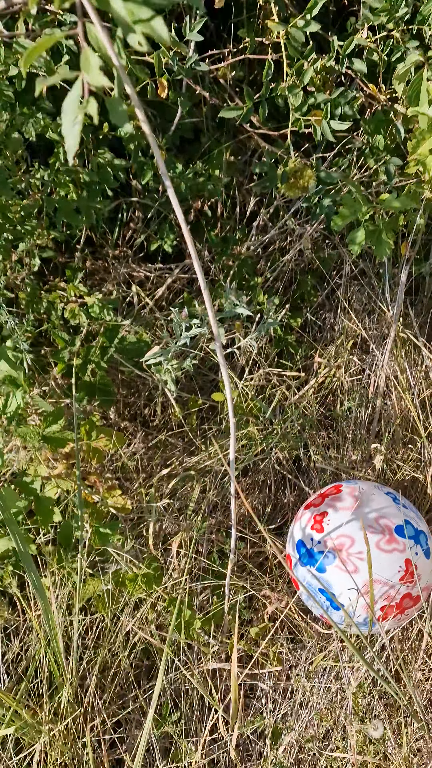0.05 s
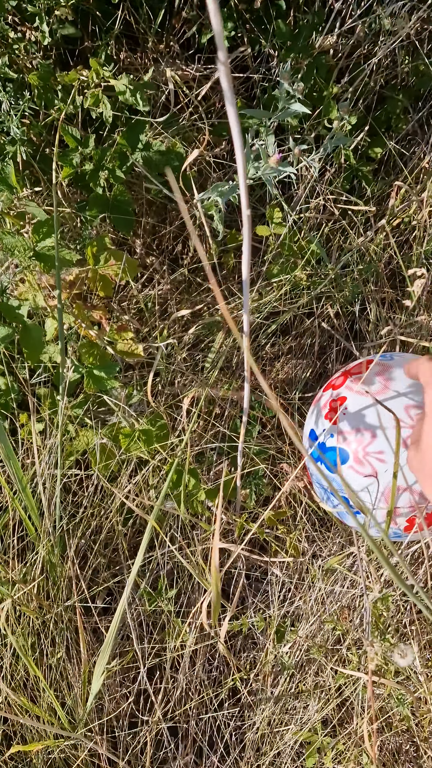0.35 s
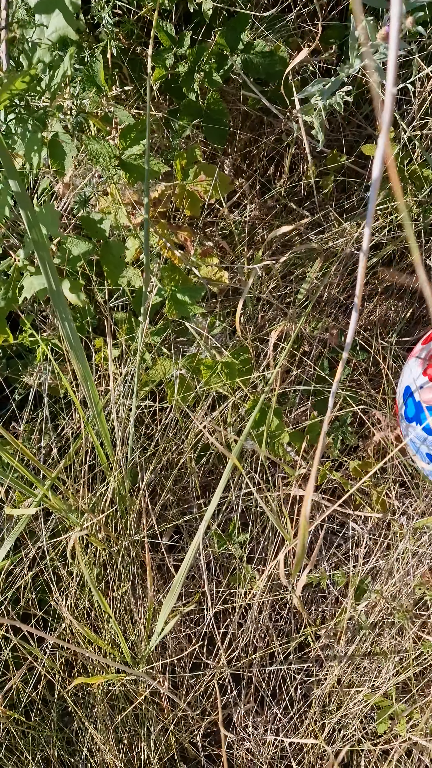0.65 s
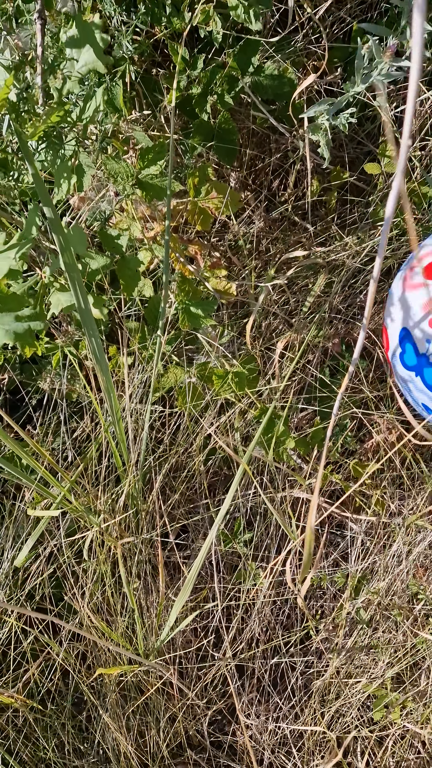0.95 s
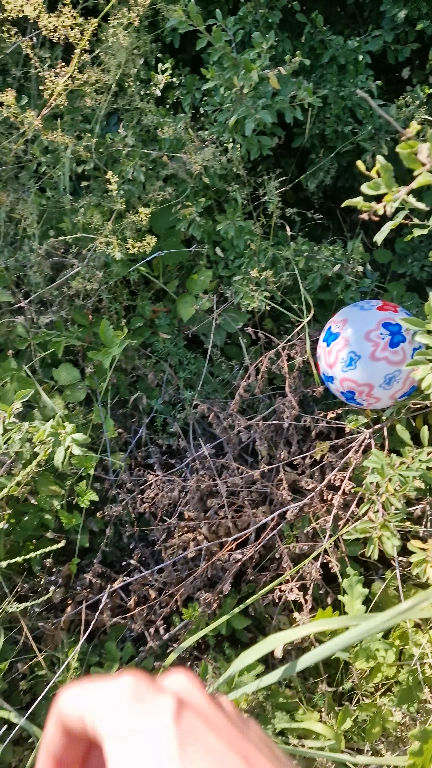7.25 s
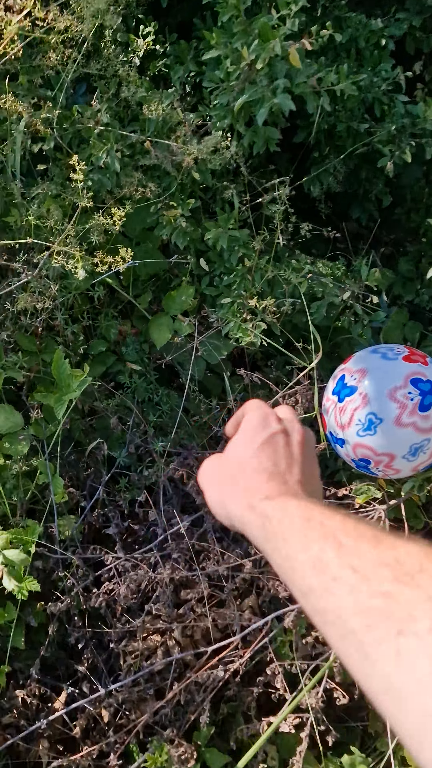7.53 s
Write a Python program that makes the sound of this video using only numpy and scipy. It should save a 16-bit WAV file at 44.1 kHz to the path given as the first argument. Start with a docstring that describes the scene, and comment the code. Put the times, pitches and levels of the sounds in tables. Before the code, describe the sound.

Dry grass and brush crackle close to a hand-held phone outdoors as a hollow plastic ball is pushed through. For the first second or so, blades swish softly and stalks snap, with dry ticks beside the microphone and stems scraping and tapping the ball, making it ring faintly. A lull follows, then light rustling from 2 to 3 seconds with a few single cracks. Near 3.9 seconds, soft handling bumps touch the phone. From about 4.2 to 6.4 seconds, stems rub and flick the ball repeatedly, giving dull scrapes, clacks and hollow rings among swishes and snaps, while light wind puffs buffet the microphone. After a brief dip, the rustle swells from 7 seconds into the loudest crunch, with hard taps on the ball and a very sharp crack at 7.6 seconds. A faint, distant hum of land and insects lies behind everything.

```python
"""Dry grass and brush crackle as a hollow plastic ball is pushed through, close to a hand-held phone.
Blades swish and stalks snap; stems scrape and tap the ball, ringing its skin and the air inside.
Dry ticks sound right beside the phone's two microphone ports, which also take soft bumps and puffs of air.
The place is outdoors, with a faint far-off hum of land and insects behind it all."""
import sys
import numpy as np
from scipy import signal
from scipy.fft import rfft, irfft, next_fast_len
from scipy.io import wavfile

SR = 44100
rng = np.random.default_rng(int(sys.argv[2]) if len(sys.argv) > 2 else 0)


def inscribe(sig):
    """Save sig as 16-bit PCM at rate SR to the path in sys.argv[1].

    A 1-D sig is mono; a 2-D sig holds one channel per row.
    Samples are clipped to [-1, 1] before scaling.
    """
    pcm = np.round(np.clip(np.atleast_2d(sig).T, -1, 1) * 32767)
    wavfile.write(sys.argv[1], SR, pcm.astype(np.int16))


N = 339129
T = np.arange(N) / SR
SLOW_T = T[::64]  # coarse clock for slow envelopes

# where the brush moves, seen from the phone: t/s, bearing (-1 left to 1 right)
BRUSH_BEARING = [(0, 0.49), (.7, -0.6), (1.4, -0.03), (2.1, 1), (3.0, 1), (4.3, -0.43), (5.8, -0.23),
                 (6.1, -0.15), (6.5, 0.17), (7.15, 0.53), (7.69, 0.86)]
# spectrum of coarse woody stalks: f/Hz, level/dB
STALK_SPECTRUM = [(300, -5), (700, -2), (1100, -4.5), (1900, 1), (2400, 1.5), (2900, -4), (3700, -1.5),
                  (4600, -1), (7000, 3.5), (15000, -34)]
# spectrum of breaking fibres: f/Hz, level/dB
FIBRE_SPECTRUM = [(1500, -44), (4700, -9.5), (5900, 0.5), (7400, 3), (9300, -2.5), (12000, 2.5)]
# resonances of the air inside the ball: f/Hz, width/Hz, level/dB
AIR_MODES = [(1344, 23.6, 1), (2040, 16.4, -4.5), (2705, 18, -13), (3450, 21, -14.5), (3980, 40, -16.5)]


def brush():
    """Fine blades fizz over crackling stalks; when few move, they go in flurries and single cracks."""
    # spectrum of fine dry blades: f/Hz, level/dB
    blade_spectrum = [(600, -59), (1500, -16.5), (3000, -15), (4600, -9), (6000, -4.5), (7400, 1.5),
                      (9300, -2.5), (11500, -0.5), (13000, -1), (15500, 1)]
    crowd_db = -46.5  # above this so many blades move at once that the crackle evens out
    blade_gain, stalk_gain = swishes()
    sparse = 1 / (1 + blade_gain / undb(crowd_db))
    flurry = unit(undb(sparse * (2.05 * walk(45) + 1.5 * walk(400))))
    fizz = drifting_comb(grains(spread_db=2.5, scatter=.4, count=60000))
    crackle = drifting_comb(grains(spread_db=1.5, scatter=.18, count=14000))
    cracks = drifting_comb(grains(spread_db=3.5, scatter=.4, count=300))
    brittle = colour(cracks, FIBRE_SPECTRUM) * sparse * undb(-3)
    blades = (colour(fizz, blade_spectrum) * undb(4) + brittle) * blade_gain * pan(shadow())
    stalks = colour(crackle, STALK_SPECTRUM) * stalk_gain * pan(.5 * shadow())
    return (blades + stalks) * flurry


def swishes():
    """Gains of blades and of stalks: each tuft bends and slips past, swelling and fading evenly in dB."""
    # tufts passing the ball: peak t/s, level/dB, rise/s, fall/s, share of coarse stalks/dB
    tufts = [(.04, -56.5, 0.68, 0.41, 1), (.21, -57, 0.12, 0.55, -1), (.5, -59, 0.4, 0.45, 1),
             (.72, -61.5, 0.84, 0.34, -4.5), (.89, -59.5, 0.73, 0.34, -6), (1.02, -57, 0.42, 0.17, -3),
             (1.11, -63.5, 0.11, 0.2, -3), (1.35, -76, 0.72, 1.0, -8.5), (2.06, -64, 0.26, 0.13, -9),
             (2.24, -66, 0.4, .085, -9), (2.36, -60, 0.14, 0.17, -4.5), (2.42, -59.5, 0.11, 0.17, -4),
             (2.53, -57, 0.098, 0.1, -5), (2.65, -63, 0.54, 0.59, -10), (3.57, -76, 0.3, 0.25, -5),
             (4.16, -68.5, 0.3, 0.28, -18), (4.3, -62, 0.11, 0.17, 1.5), (4.55, -66, 0.55, 0.23, -1.5),
             (4.75, -62, 0.21, 0.2, -17), (4.87, -53.5, 0.038, 0.1, -1), (5.005, -56.5, 0.15, 0.24, -1.5),
             (5.26, -69.5, 0.58, 0.77, 3.5), (5.481, -59.5, 0.089, 0.089, -13),
             (5.565, -53.5, 0.053, 0.092, -24), (5.82, -66, 0.3, 0.26, -9.5), (5.99, -50.5, 0.34, 0.5, -5),
             (6.1, -53.5, 0.36, 0.59, -3), (6.35, -54, 0.48, 0.4, -6.5), (7.2, -48.5, 0.25, 0.35, -5),
             (7.38, -44.5, 0.67, 0.45, -1.5), (7.469, -32, 0.22, 0.18, -5.5), (7.494, -28, 0.12, 0.13, -7),
             (7.577, -37, 0.1, 0.17, 0.5), (7.67, -48.5, 0.071, .2, -16)]
    range_db = 32.5  # climbed in the rise time, dropped in the fall time
    blades, stalks = 0, 0
    for s, db, rise, fall, coarse_db in tufts:
        gain = undb(db - range_db * np.maximum((s - SLOW_T) / rise, (SLOW_T - s) / fall))
        blades = np.hypot(blades, gain)
        stalks = np.hypot(stalks, gain * undb(coarse_db))
    return np.interp(T, SLOW_T, blades), np.interp(T, SLOW_T, stalks)


def snaps():
    """A stalk breaks in a tight volley of bright fibre cracks over a woody body; then splinters settle."""
    # stalks breaking: t/s, level/dB, decay/s, woody body/dB
    breaks = [(.139, -46.5, .002, -18), (.191, -38.5, .002, -18), (.222, -43, .004, -18),
              (.291, -46.5, .002, -14), (.474, -48, .002, -12), (.583, -42, .0015, -12),
              (.639, -42, .002, -15), (.741, -50, .002, -5), (.7675, -39, .002, -26),
              (.876, -47, .002, -20), (1.022, -46, .003, -11), (2.670, -52, .002, -16),
              (2.6985, -47.5, .0015, -18), (2.9585, -38.5, .0013, -28), (3.8645, -55, .002, -6),
              (4.244, -49, .001, -18), (4.410, -55, .002, -14), (4.526, -53.5, .003, 0),
              (4.859, -44.5, .007, -4), (4.904, -46, .002, -14), (5.063, -52, .003, -12),
              (5.195, -53, .005, -18), (5.2205, -53, .0015, -3), (5.3295, -47.5, .002, -8),
              (5.564, -46, .005, -14), (5.7765, -41.5, .0016, -8), (6.123, -43, .002, -10),
              (6.3235, -35, .002, -15), (6.502, -50, .006, -15), (6.7663, -40, .0017, -16),
              (6.890, -52, .004, -16), (7.3715, -23, .0016, -22), (7.555, -30, .002, -15),
              (7.579, -22, .0013, -9), (7.599, -28, .0015, -10), (7.6097, -9, .001, -12),
              (7.624, -27, .002, -16)]
    settle_db, settle_s = -25, .018
    out, t = np.zeros((2, N)), T[:SR // 8]
    for s, db, decay, body_db in breaks:
        fibres = unit(rng.choice([-1, 1], (2, len(t))) * rng.exponential(size=len(t)))
        crack = fibres * 2 * burst(t, decay, rise=decay / 4)
        splinters = fibres * undb(settle_db) * burst(t, settle_s, rise=decay)
        body = undb(body_db) * colour(crack[:1], STALK_SPECTRUM)
        add(out, s, (colour(crack + splinters, FIBRE_SPECTRUM) + body) * undb(db))
    return out * pan(shadow())


def scrapes():
    """Stems stick and slip on the plastic: at each slip the skin answers dully and the air rings on."""
    # spectrum of the rubbed skin: f/Hz, level/dB
    skin_spectrum = [(60, -5.5), (160, -20.5), (280, 6), (460, 5), (590, -9), (760, -3), (1000, -12.5),
                     (1800, -13), (3000, -15), (8000, -92)]
    # the skin's own drum note: f/Hz, width/Hz, level/dB
    drum_mode = [(471, 90, 0)]
    # the spot being rubbed favours the lowest ring or the higher ones: t/s, overtones/dB
    rub_balance = [(.7, 5), (.85, -1), (4.3, 15), (4.37, 2.5), (5.3, 2), (5.8, -5.5)]
    skin_gain, air_gain = slides()
    slipping = unit(undb(1.94 * walk(60) + 1.4 * walk(250)))
    slips = grains(spread_db=1, scatter=.3, count=4000) * slipping
    skin = colour(slips * skin_gain, skin_spectrum) * undb(-5)
    drum = resonate(slips[0] * skin_gain, drum_mode) * undb(-10.5)
    air_drive = slips[1] * air_gain
    lowest = resonate(air_drive, AIR_MODES[:1]) * undb(-3)
    overtones = resonate(air_drive * undb(follow(rub_balance)), AIR_MODES[1:]) * undb(-6.5)
    return (skin + ring_at_ports(drum + flex(lowest + overtones))) * pan(-1.5)


def slides():
    """Gains of the ball's skin and of its air: each stem grips quickly, eases as it slides and lets go."""
    # stems sliding on the ball: start t/s, length/s, level/dB, ring of the air inside/dB
    strokes = [(0.0, 0.078, -50.5, -16), (0.203, 0.034, -56, -11), (0.264, 0.17, -59.5, -12),
               (0.435, 0.03, -55.5, -16), (0.628, 0.17, -60, -6), (0.824, 0.14, -62.5, -2),
               (1.008, 0.12, -68, -10), (4.271, 0.05, -51, -12), (4.344, 0.33, -55, -12),
               (4.494, 0.086, -52, -13), (4.699, 0.058, -53, -13), (4.76, 0.04, -60, -3),
               (4.867, 0.046, -55, -9), (4.958, 0.12, -52, -13), (5.206, 0.081, -54.5, -10.5),
               (5.306, 0.09, -55, -12.5), (5.456, 0.086, -61.5, -9.5), (5.546, 0.024, -59, -12),
               (5.77, 0.12, -53, -5), (5.916, 0.16, -49.5, -7.5), (6.063, 0.045, -41, -24),
               (6.141, 0.041, -51.5, -12), (6.258, 0.13, -63.5, -10), (7.153, 0.36, -62, -4),
               (7.382, 0.1, -48.5, -28), (7.46, 0.027, -34.5, -35), (7.55, 0.043, -45, -5)]
    grip_s, sag_db_per_s, release_s = .0039, 13.5, .027
    skin, air = 0, 0
    for s, length, db, ring_db in strokes:
        t = np.maximum(SLOW_T - s, 0)
        grip = 1 - np.exp(-t / grip_s)
        release = np.exp(-np.maximum(t - length, 0) / release_s)
        gain = grip * undb(db - sag_db_per_s * t) * release
        skin = np.hypot(skin, gain)
        air = np.hypot(air, gain * undb(ring_db))
    return np.interp(T, SLOW_T, skin), np.interp(T, SLOW_T, air)


def flex(ring):
    """The rubbed ball keeps changing shape, so its ring wavers to and fro in time."""
    waver_s = .00019
    return np.interp(T + waver_s * walk(50), T, ring)


def taps():
    """A stem flicks the ball: a clack, a swing of the skin at the stem's pitch, then a hollow ring."""
    # stems striking the ball: t/s, level/dB, decay/s, stem f/Hz, ring level/dB, its overtones/dB
    flicks = [(.031, -47.5, .0047, 600, -57, 2), (.449, -44, .0015, 405, -60, -3),
              (.853, -59, .003, 700, -54.5, -7), (.886, -64, .003, 450, -66, 12),
              (1.021, -45.5, .0025, 1800, -54, -3), (1.252, -58, .013, 376, -79, -2),
              (4.25, -43.5, .016, 436, -72, 15), (4.272, -48, .012, 310, -70, 10),
              (4.288, -44, .01, 624, -64, 19), (4.462, -45.5, .0059, 640, -58, 1),
              (4.525, -44, .003, 520, -60, -4), (4.738, -41, .011, 397, -59, -3),
              (4.781, -54, .012, 1350, -47.5, -11), (4.941, -37.5, .008, 580, -52, 0),
              (4.993, -46, .0018, 600, -57, 3), (5.221, -44, .0016, 980, -56, 0),
              (5.328, -37, .0047, 480, -51, -.5), (5.49, -48, .016, 494, -63, -8),
              (5.785, -52, .012, 500, -55, -12), (6.168, -50, .0055, 1400, -50, -14),
              (6.077, -32.5, .016, 480, -48, -14), (6.091, -40, .012, 770, -45, -14),
              (7.486, -28, .008, 320, -62, -4), (7.502, -32, .008, 540, -62, -4),
              (7.5795, -16.5, .0011, 690, -54, -6), (7.6098, -17.5, .0018, 450, -52, 0)]
    # spectrum of a clack: multiple of the stem's pitch, level/dB
    clack_spectrum = [(.2, -5.5), (.6, -7.5), (1, 3.5), (1.5, -4.5), (2.4, -12.5), (5, -21), (12, -25.5)]
    squeeze = .013  # each tap dents the ball and detunes its ring by about this share
    clacks, rings, t = np.zeros((2, N)), np.zeros((1, N)), T[:SR // 6]
    contact = grains(spread_db=3, scatter=.24, count=200000)
    for (s, db, decay, hz, ring_db, overtones_db), dent in zip(flicks, rng.standard_normal(len(flicks))):
        blow = np.roll(contact, -int(s * SR), axis=1)[:, :len(t)] * burst(t, decay, rise=.000072)
        clack = colour(blow, np.array(clack_spectrum) * (hz, 1))
        skin_note = damped_tone(t, hz, decay, rise=decay / 10)
        add(clacks, s, (clack + skin_note) * undb(db - 5.5))
        detune = 1 + squeeze * dent
        lowest, *overtones = [
            undb(mode_db) * damped_tone(t, mode_hz * detune, 1 / (np.pi * width), rise=decay / 4)
            for mode_hz, width, mode_db in AIR_MODES]
        add(rings, s, undb(ring_db) * (lowest + undb(overtones_db) * sum(overtones))[None])
    return (clacks + ring_at_ports(rings[0])) * pan(-.72)


def ticks():
    """Hard little contacts ring for a cycle or two and push the two ports in opposite directions."""
    # dry ticks right beside the phone: t/s, level/dB, f/Hz
    contacts = [(0.013, -38.5, 1290), (0.236, -44, 1500), (0.297, -45, 1310), (0.3123, -42, 1650),
                (0.323, -41.5, 1660), (0.4233, -39, 1584), (.4945, -40, 1610), (1.192, -57, 1350)]
    # ring of a tick: multiple of its pitch, level/dB, decay/s
    modes = [(.68, -9, 0.0011), (1, 7.5, 0.0008), (1.27, -1, 0.00077)]
    top_hz = 2450
    out, t = np.zeros((2, N)), T[:SR // 50]
    for s, db, hz in contacts:
        tick = sum(undb(mode_db) * damped_tone(t, multiple * hz, decay, rise=.00018)
                   for multiple, mode_db, decay in modes)
        add(out, s, undb(db) * tick * np.array([[1], [-1]]))
    return signal.sosfilt(signal.butter(6, top_hz, fs=SR, output="sos"), out) * pan(-9)


def bumps():
    """Handling noise: soft contacts push the phone to and fro for a cycle or two."""
    # bumps on the phone: peak t/s, level/dB, f/Hz, half length/s
    knocks = [(3.869, -41, 275, 0.0037), (3.901, -39, 227, 0.0015), (3.9177, -36, 290, 0.0014),
              (3.962, -34.5, 252, 0.0016), (6.867, -48, 219, 0.0021)]
    motion = sum(undb(db) * swell(s, half) * np.cos(2 * np.pi * hz * (T - s)) for s, db, hz, half in knocks)
    return motion * pan(-5)


def wind():
    """A light breeze and a few puffs of air buffet the microphone ports."""
    # puffs on the microphone: peak t/s, level/dB, half length/s
    puffs = [(0.08, -44.5, 0.067), (0.225, -51.5, 0.11), (3.937, -52.5, 0.074), (5.43, -49.5, 0.046),
             (5.593, -48, 0.051), (5.725, -44, 0.082), (5.945, -43.5, 0.045), (6.082, -45.5, 0.058),
             (6.313, -52.5, 0.04), (7.57, -54, 0.054), (7.689, -53, 0.038)]
    # spectrum of the buffeting: f/Hz, level/dB
    buffet_spectrum = [(15, -14.5), (35, 1), (68, 3.5), (105, -13), (180, -27), (400, -54), (2000, -95)]
    gusts = sum(undb(db) * swell(s, half) for s, db, half in puffs)
    breeze = undb(-66.5 + .5 * walk(3.2))
    buffet = colour(diffuse(alike_hz=159), buffet_spectrum)
    return buffet * np.hypot(gusts, breeze) * undb(1.5) * pan(-.33)


def distant_land():
    """Land and insects hum far off on all sides, almost steady."""
    # spectrum of the far background: f/Hz, level/dB
    land_spectrum = [(60, -2.5), (110, 6), (190, -12), (290, -1), (470, -8), (1000, -7.5), (1650, -13.5),
                     (1950, -12), (2600, -24), (5000, -25), (7500, -13), (9000, -26), (11500, -33),
                     (16000, -35.5)]
    return colour(diffuse(alike_hz=560), land_spectrum) * undb(-69.5 + .75 * walk(8))


def drifting_comb(rustle):
    """Two short drifting delayed copies give the rustle a shifting, comb-like colour."""
    # delayed copies: delay/s, level/dB
    delays = [(.0017, -10.5), (.0046, -4)]
    copies = 0
    for delay_s, db in delays:
        lag = (SR * delay_s * undb(.7 * walk(3))).astype(int)
        copies = copies + undb(db) * rustle[:, np.clip(np.arange(N) - lag, 0, N - 1)]
    return unit(rustle + copies)


def ring_at_ports(ring):
    """As the ball turns, its ring reaches the two ports more or less out of step."""
    # lead of the left port over the right: t/s, phase/rad
    phase_lead = [(0, 2.1), (.7, 0.83), (1.1, 0.73), (4.28, 2.2), (4.55, 2.1), (4.78, 1.4), (5.3, 1.35),
                  (6.1, 1.5), (7.69, 2)]
    turn = np.exp(.5j * np.array([[1], [-1]]) * follow(phase_lead))
    return np.real(signal.hilbert(ring, next_fast_len(N))[:N] * turn)


def shadow():
    """Left minus right in dB: the phone shades its far port from the bright crackle."""
    return -2.3 - 3.7 * follow(BRUSH_BEARING)


def grains(spread_db, scatter, count):
    """Clicks of uneven size from around the brush's bearing; each reaches the nearer port first."""
    port_lag_s = .00045  # at a bearing of 1
    at = rng.integers(64, N - 64, count)
    size = rng.choice([-1, 1], count) * undb(spread_db * np.minimum(rng.exponential(size=count), 5))
    bearing = follow(BRUSH_BEARING)[at] + scatter * rng.standard_normal(count)
    lag = np.clip(port_lag_s * SR * bearing, -60, 60).astype(int)
    return unit(np.array([np.bincount(at + lag, size, N), np.bincount(at, size, N)]))


def diffuse(alike_hz):
    """Noise from all round: the same in both ports below alike_hz, unrelated above."""
    mid, side = rng.standard_normal((2, N))
    side = signal.sosfilt(signal.butter(1, alike_hz, "high", fs=SR, output="sos"), side)
    return unit(np.array([mid + side, mid - side]))


def resonate(x, modes):
    """Ring the modes (f/Hz, width/Hz, level/dB); white noise keeps its power."""
    t = T[:SR // 5]
    ring = sum(undb(db) * np.exp(-np.pi * width * t) * np.sin(2 * np.pi * hz * t) for hz, width, db in modes)
    return signal.fftconvolve(x, ring / np.linalg.norm(ring))[:N]


def colour(x, points, size=4096):
    """Minimum-phase filter through the points (f/Hz, level/dB); white noise keeps its power."""
    hz, db = np.transpose(points)
    bin_hz = np.arange(size // 2 + 1) * SR / size
    gain = undb(np.interp(np.log(bin_hz + 1), np.log(hz), db))
    cepstrum = irfft(np.log(unit(gain)))[:size // 2]
    cepstrum[0] /= 2
    impulse = irfft(np.exp(rfft(2 * cepstrum, size)))
    return signal.fftconvolve(x, impulse[None], axes=1)[:, :x.shape[1]]


def burst(t, decay, rise):
    """Envelope of one fracture or blow."""
    return (1 - np.exp(-t / rise)) * np.exp(-t / decay)


def damped_tone(t, hz, decay, rise):
    """One struck mode dying away."""
    return burst(t, decay, rise) * np.sin(2 * np.pi * hz * t)


def swell(peak_s, half_s):
    """Bell-shaped envelope, down to 1/e at half_s either side of its peak."""
    return np.exp(-((T - peak_s) / half_s) ** 2)


def walk(rate):
    """Glide between random levels, rate of them a second; spread near 1."""
    knots = rng.standard_normal(N // 50)
    return np.interp(T * rate, np.arange(len(knots)), knots)


def follow(curve):
    """A curve (t/s, value), sample by sample."""
    return np.interp(T, *np.transpose(curve))


def pan(db):
    """Left and right gains for a level difference."""
    gains = undb(np.array([db, -db]).reshape(2, -1) / 2)
    return gains / np.sqrt(np.mean(gains ** 2, axis=0))


def add(out, s, x):
    """Mix a short sound in at time s."""
    i = int(s * SR)
    out[:, i:i + x.shape[1]] += x[:, :N - i]


def undb(db):
    """Decibels to gain."""
    return 10 ** (np.asarray(db) / 20)


def unit(x):
    """Scale to rms 1."""
    return x / np.sqrt(np.mean(x ** 2))


def scene():
    """Brush and ball close up, handling and wind on the phone, the land far behind."""
    return brush() + snaps() + scrapes() + taps() + ticks() + bumps() + wind() + distant_land()


def record(dry):
    """The phone cuts the top treble steeply."""
    top_hz = 15950
    return signal.sosfilt(signal.ellip(10, .2, 75, top_hz, fs=SR, output="sos"), dry)


dry = scene()
out = record(dry)
inscribe(out)
```